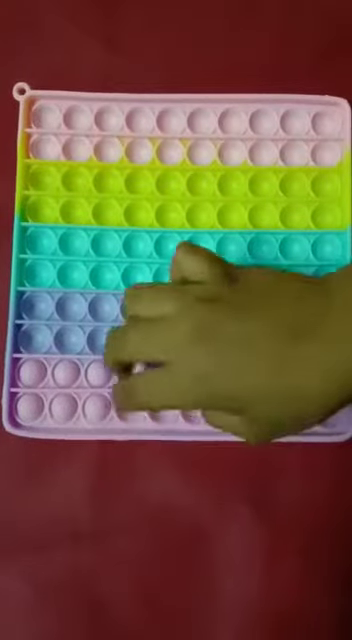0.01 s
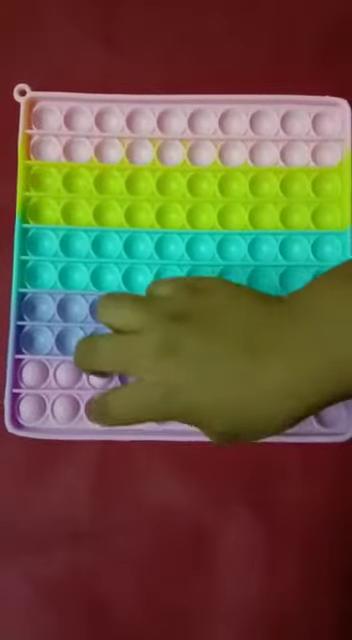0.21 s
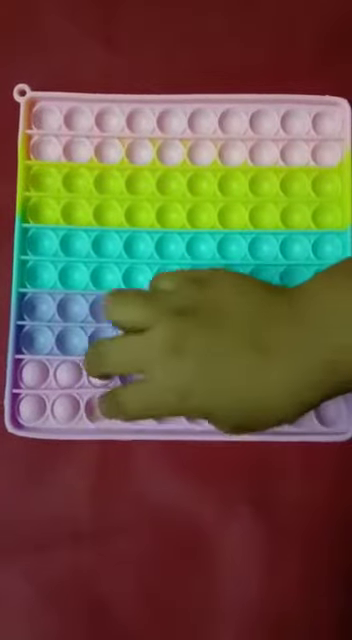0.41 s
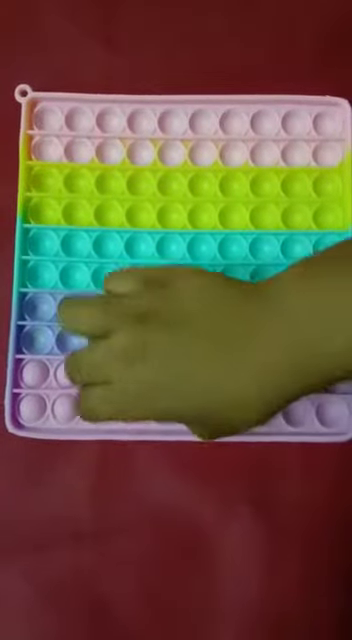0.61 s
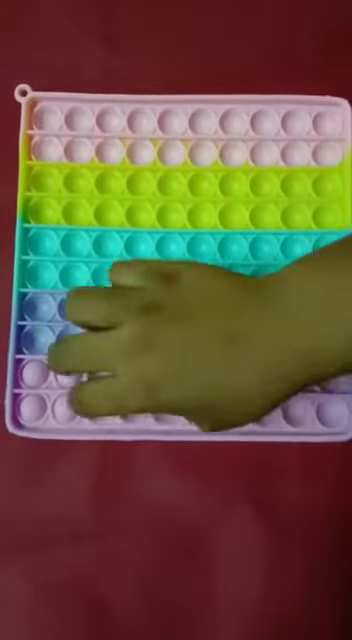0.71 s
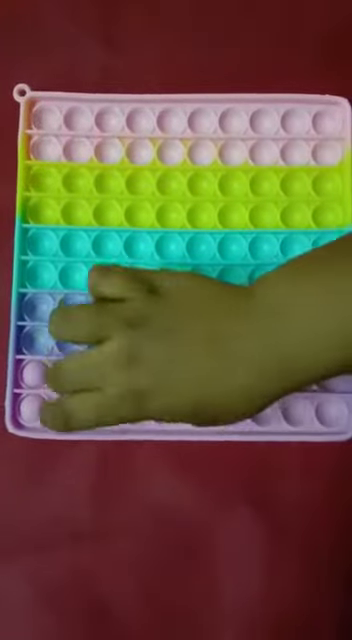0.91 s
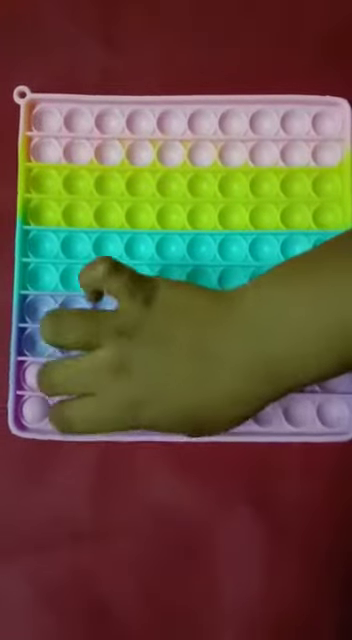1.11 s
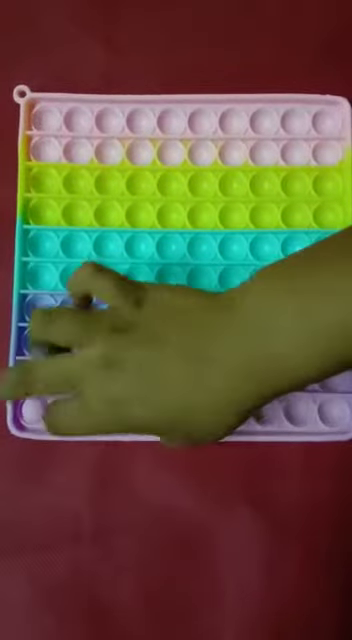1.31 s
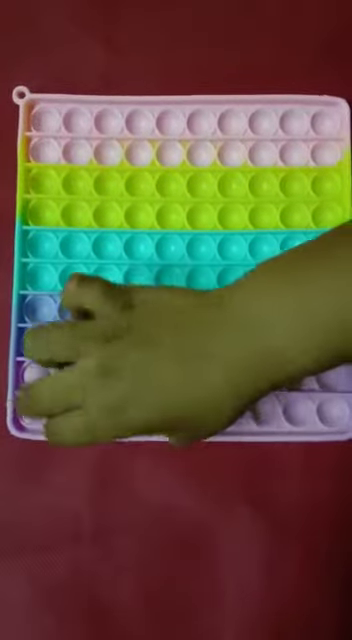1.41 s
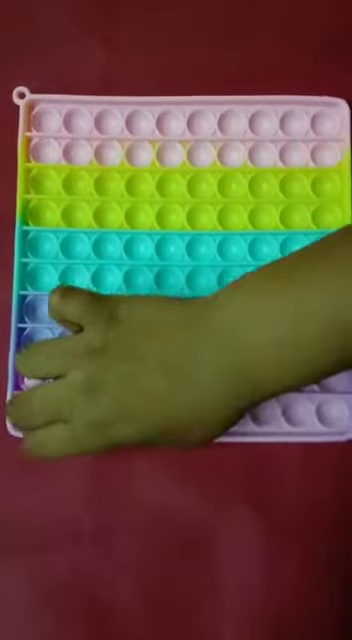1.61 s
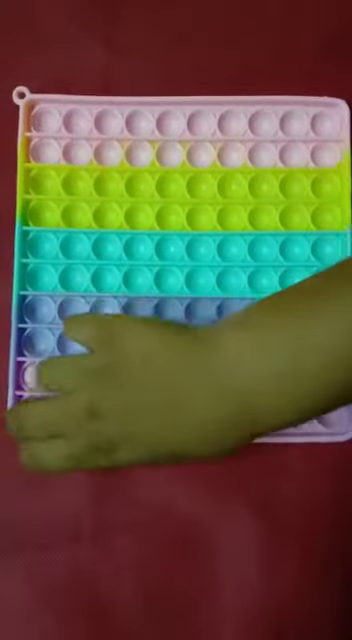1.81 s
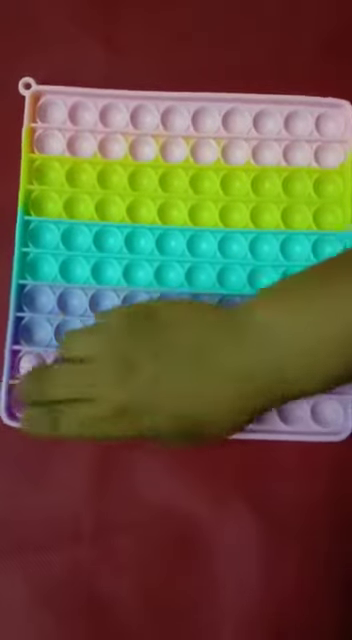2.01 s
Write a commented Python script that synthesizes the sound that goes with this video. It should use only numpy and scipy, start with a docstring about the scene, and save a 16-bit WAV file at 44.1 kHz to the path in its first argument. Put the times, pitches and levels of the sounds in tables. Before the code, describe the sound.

A silicone fidget toy pops five times under a finger: four hollow snaps, a pause, then a softer, clickier one. Faint fingertip squeaks fall between, close to the microphone, in a small hard room with low rumble.

```python
"""Popping a fidget toy

A finger presses five bubbles of a silicone toy lying on a table in a small, hard room.
Each dome snaps through with a short hollow pop and a soft thump; the ceiling answers and
the room rings briefly. In between, fingertips tick and a palm brushes on the rubber,
over a low room rumble and faint hiss."""
import sys
import numpy as np
from scipy.fft import rfft, irfft, next_fast_len
from scipy.io import wavfile
from scipy.ndimage import uniform_filter1d

SR = 44100
rng = np.random.default_rng(int(sys.argv[2]) if len(sys.argv) > 2 else 0)


def output_pcm(signal):
    """Save a mono or channel-first signal as 16-bit PCM at the path in sys.argv[1].

    Samples are clipped to [-1, 1] before scaling.
    """
    pcm = np.clip(np.atleast_2d(signal).T, -1, 1) * 32767
    wavfile.write(sys.argv[1], SR, np.round(pcm).astype(np.int16))


N = 92610

# Tone of the background noise: pitch_hz, level_db
BACKGROUND_TONE = [(15, -65.5), (25, -23.5), (53, -22.5), (69, -6), (91, 2.5), (113, -6), (144, -0.5),
                   (178, -9.5), (349, -13), (666, -19.5), (1050, -22.5), (1620, -22.5), (1850, -22),
                   (2700, -23.5), (3340, -24), (4150, -26), (15500, -34)]
# Left-right difference, compared with the middle: pitch_hz, level_db
STEREO_WIDTH = [(30, -4.5), (55, -13), (90, -19.5), (180, -11.5), (350, -5), (1000, -6.5), (4000, -5),
                (6000, -3.5), (15000, -32.5)]
# How the rumble swells and sinks: time_s, level_db
RUMBLE_SWELL = [(0, -1), (.45, 0), (.75, -0.5), (1.2, 0), (1.5, -3), (1.8, -1), (2.0, 0), (2.1, 1)]
# One row per bubble: start_s, level_db, pitch_ratio, click_db (added to level_db), thump_db, thump_hz,
# thud_db, room_db, room_fade_s, room_treble_db, colour_db (a list of boosts and cuts)
POPS = [(0.2334, -8.5, 1.002, -49, -43, 204.6, -55, -25.5, 0.3, -1, [-11.5, -1.5, -1, 1, 4, -2, 2.5, -1]),
        (0.523, -12.5, 0.99, -55, -46, 135, -42.5, -21, 0.19, -0.5, [-2.5, 0.5, 0.5, -2, -4, 2.5, -1, -2]),
        (0.9322, -9.5, 1.027, -50, -41.5, 174, -50.5, -21, 0.23, -6, [-2, 0, 2, -1, -1, 0.5, -4.5, 8.5]),
        (1.1710, -10, 1.026, -48, -33, 296, -47.5, -26, 0.2, -9, [-32.5, 10, 3, 0, -9.5, -5, -9, 8.5]),
        (1.8275, -20.5, 0.986, -12.5, -31, 167, -39, -27.5, 0.16, -5.5, [-7.5, 4, -2.5, 1, -10, 11.5, 6, 15.5])]
# Where those boosts and cuts sit: pitch_hz
COLOUR_HZ = [800, 1100, 1900, 2800, 3800, 4500, 5100, 7500]
# Notes that a dome and its air pocket ring at: pitch_hz, level_db, fade_s
DOME_NOTES = [(815, -13, .011), (1048, -4.5, .014), (1190, -12.5, .011), (1742, -9, 0.0055),
              (2263, -7, .012), (2780, 0, 0.0071), (3420, -10.5, 0.0068), (3785, -4.5, 0.011),
              (4510, -14, .006), (5057, -18, 0.011), (5930, -29, 0.0049), (7000, -39.5, .008),
              (7900, -45, 0.011), (8600, -54, .007)]
# Tone of the skin's click: pitch_hz, level_db
CLICK_TONE = [(300, -3.5), (2000, -1), (5000, 0), (7500, -7.5), (10000, -14.5), (12200, -6.5),
              (13500, -12.5), (15500, -10)]
# Tone of the shuddering table: pitch_hz, level_db
THUD_TONE = [(25, -31.5), (45, -14), (75, -2), (170, 1), (300, -8), (500, -10.5), (900, -32), (3000, -80)]
# Tone of the room's ring: pitch_hz, level_db
ROOM_TONE = [(200, -36.5), (550, -29), (720, -11.5), (900, -4.5), (1200, -2.5), (1500, -5.5), (1850, 0.5),
             (2600, -3), (3800, -0.5), (4800, -7), (5600, -21.5), (6500, -31.5), (9000, -51.5),
             (15000, -57.5)]
# Notes that linger between the walls (standing waves): pitch_hz, level_db
ROOM_NOTES = [(825, -15.5), (890, -15.5), (1008, -12.5), (1175, -23.5), (1327, -13.5), (1537, -14),
              (1743, -14.5), (1816, -17.5), (1954, -15), (2204, -14.5), (2322, -22.5), (2785, -19),
              (3441, -14.5), (3788, -16)]
# Bounces off the ceiling and walls: delay_s, level_db
ECHOES = [(.0104, -15), (.0119, -20.5), (.0135, -21.5)]
# Fingertip squeaks: start_s, level_db, pitch_hz, rise_s, fade_s, rub_db (added to level_db)
TICKS = [(0.632, -53, 3660, 0.0018, 0.066, 6), (0.657, -60.5, 3620, 0.0025, 0.078, 3),
         (.836, -56.5, 3766, .005, 0.05, 1.5), (.846, -49.5, 2810, .002, 0.027, -13),
         (1.272, -52, 3800, 0.00058, 0.044, -1.5), (1.275, -53.5, 1054, .004, 0.054, -2.5),
         (1.304, -47.5, 3850, .001, 0.031, -4.5), (1.44, -52, 2765, 0.0066, .07, -1),
         (1.449, -45.5, 4375, .003, 0.032, -8.5), (1.706, -60, 4570, 0.0037, 0.088, -2),
         (1.7731, -48, 2185, 0.00056, 0.019, -12), (1.968, -63.5, 1050, 0.0046, .2, -3.5)]
# Tone of a rubbing fingertip: pitch_hz, level_db
RUB_TONE = [(300, -20.5), (1000, -8.5), (2700, 2.5), (4800, 2.5), (6500, -20), (12000, -39)]
# How loud the sliding palm is: time_s, level_db
PALM_SWELL = [(.95, -75.5), (1.05, -62.5), (1.2, -76.5), (1.35, -66.5), (1.47, -62.5), (1.6, -69),
              (1.75, -83)]
# Tone of the sliding palm: pitch_hz, level_db
PALM_TONE = [(150, -25.5), (330, -2), (430, -2.5), (520, 0.5), (700, -15), (2000, -34.5), (8000, -61)]

POP_RISE_S = 0.00051


def amp(db):
    """Turn decibels into a number to multiply by."""
    return 10 ** (np.asarray(db) / 20)


def along(points, hz):
    """Read a tone table at any pitch, spacing the octaves evenly."""
    pitches, levels = np.transpose(points)
    return np.interp(np.log(hz + 1e-6), np.log(pitches), levels)


def filtered(x, response):
    """Turn each pitch in a sound up or down by response(hz)."""
    size = x.shape[-1]
    padded = next_fast_len(size + 8192)
    gain = response(np.fft.rfftfreq(padded, 1 / SR))
    return irfft(rfft(x, padded) * gain, padded)[..., :size]


def noise(level_db, size):
    """Noise with the tone level_db(hz), scaled to an average power of 1."""
    x = filtered(rng.standard_normal(size), lambda hz: amp(level_db(hz)))
    return x / np.sqrt(np.mean(x ** 2) + 1e-20)


def fade(t, fade_s):
    """Die away by 60 dB every fade_s seconds."""
    return np.exp(-np.log(1000) * t / fade_s)


def add(track, start_s, sound):
    """Mix a sound in at its start time."""
    i = max(round(start_s * SR), 0)
    track[i:i + len(sound)] += sound[:N - i]


def background(level_db=-56, rumble_hz=600, whine_db=-72.5, whine_hz=1830, whine_width_hz=55):
    """The room rumbles and hisses with a faint thin whine, much the same in both ears."""
    swell_db = np.interp(np.arange(N) / SR, *np.transpose(RUMBLE_SWELL))
    middle = noise(lambda hz: along(BACKGROUND_TONE, hz), N)
    rumble = filtered(middle, lambda hz: 1 / (1 + (hz / rumble_hz) ** 2))
    middle += rumble * (amp(swell_db) - 1)
    side = noise(lambda hz: along(BACKGROUND_TONE, hz), N)
    side = filtered(side, lambda hz: amp(along(STEREO_WIDTH, hz)))
    whine = noise(lambda hz: -20 * np.log10(1 + ((hz - whine_hz) / whine_width_hz) ** 2), N)
    return amp(level_db) * np.array([middle + side, middle - side]) + amp(whine_db) * whine


def dome_snap(t, pitch_ratio, colour, hold_s=0.0019):
    """A dome flips: its notes are driven for a moment, then the rubber deadens them."""
    since_hold = np.maximum(t - hold_s, 0)
    ring = np.zeros(len(t))
    for k, (hz, db, fade_s) in enumerate(DOME_NOTES):
        note = (-1) ** k * np.sin(2 * np.pi * hz * pitch_ratio * t)  # every other wave is upside down
        ring += amp(db + along(colour, hz)) * fade(since_hold, fade_s) * note
    return ring * (1 - np.exp(-t / POP_RISE_S))


def skin_click(t, tail_db=-19):
    """Skin slips off the flipping dome with a bright click."""
    shape = fade(t, fade_s=0.014) + amp(tail_db) * fade(t, fade_s=0.095)
    return noise(lambda hz: along(CLICK_TONE, hz), len(t)) * shape * (1 - np.exp(-t / POP_RISE_S))


def finger_thump(t, pitch_hz, rise_s=0.002, fade_s=0.065):
    """The finger lands on the table through the rubber."""
    return np.sin(2 * np.pi * pitch_hz * t) * fade(t, fade_s) * (1 - np.exp(-t / rise_s))


def table_thud(t, rise_s=0.0016, fade_s=0.16):
    """The table shudders under the hand."""
    return noise(lambda hz: along(THUD_TONE, hz), len(t)) * fade(t, fade_s) * (1 - np.exp(-t / rise_s))


def room_ring(t, colour, fade_s, treble_db, treble_hz=3460, early_db=-8, delay_s=0.0093, rise_s=0.002):
    """Nearby things scatter a pop weakly, then the walls answer with a wash and lingering notes."""
    def tint_db(hz):
        treble_share = 1 - 1 / (1 + (hz / treble_hz) ** 4)
        return 0.55 * along(colour, hz) + treble_db * treble_share

    wash = amp(-1.5) * noise(lambda hz: along(ROOM_TONE, hz) + tint_db(hz), len(t))
    notes = sum(amp(db + tint_db(hz)) * np.sin(2 * np.pi * (hz * t + rng.random()))
                for hz, db in ROOM_NOTES)
    arrival = np.clip((t - delay_s) / rise_s, amp(early_db), 1)
    return (wash + notes) * arrival * fade(t, fade_s)


def pops():
    """Each pressed bubble snaps, clicks and thumps, and the room answers."""
    out, t = np.zeros(N), np.arange(SR // 3) / SR
    for (start_s, level_db, pitch_ratio, click_db, thump_db, thump_hz,
         thud_db, room_db, room_fade_s, room_treble_db, colour_db) in POPS:
        colour = list(zip(COLOUR_HZ, colour_db))
        snap = amp(level_db) * dome_snap(t, pitch_ratio, colour)
        add(out, start_s, snap + amp(level_db + click_db) * skin_click(t))
        add(out, start_s, amp(thump_db) * finger_thump(t, thump_hz) + amp(thud_db) * table_thud(t))
        add(out, start_s, amp(room_db) * room_ring(t, colour, room_fade_s, room_treble_db))
        for delay_s, echo_db in ECHOES:
            add(out, start_s + delay_s, amp(echo_db) * snap)
    return out


def noise_gate(x, threshold_db=-45.5, cut_db=15, softness_db=4.5):
    """A noise suppressor turns the sound down once it has faded below a threshold."""
    power = np.abs(uniform_filter1d(x ** 2, size=350))
    level_db = 10 * np.log10(power + 1e-12)
    closed = (1 - np.tanh((level_db - threshold_db) / softness_db)) / 2
    return x * amp(-cut_db * closed)


def fingertips(waver_share=0.039, waver_hz=250):
    """Skin touches and leaves the rubber: a short wavering squeak over a hissy rub."""
    out, t = np.zeros(N), np.arange(SR // 8) / SR
    for start_s, level_db, pitch_hz, rise_s, fade_s, rub_db in TICKS:
        shape = np.minimum(t / rise_s, 1) * fade(np.maximum(t - rise_s, 0), fade_s)
        waver = noise(lambda hz: -20 * np.log10(1 + (hz / waver_hz) ** 2), len(t))
        squeak_hz = pitch_hz * (1 + waver_share * waver)
        squeak = np.sqrt(2) * np.sin(2 * np.pi * np.cumsum(squeak_hz) / SR)
        rub = noise(lambda hz: along(RUB_TONE, hz), len(t))
        add(out, start_s, amp(level_db) * shape * (squeak + amp(rub_db) * rub))
    return out


def palm():
    """The palm slides softly over the rubber."""
    level_db = np.interp(np.arange(N) / SR, *np.transpose(PALM_SWELL))
    return amp(level_db) * noise(lambda hz: along(PALM_TONE, hz), N)


def scene():
    """Pops and hand noises in the middle, the background around them."""
    return noise_gate(pops()) + fingertips() + palm() + background()


def record(dry):
    """The recorder clips at full scale and keeps nothing above 15600 Hz."""
    return filtered(np.clip(dry, -1, 1), lambda hz: hz < 15600)


dry = scene()
out = record(dry)
output_pcm(out)
```